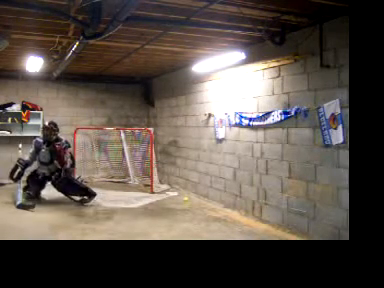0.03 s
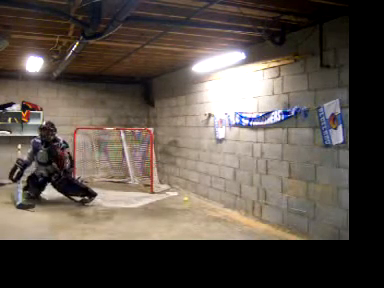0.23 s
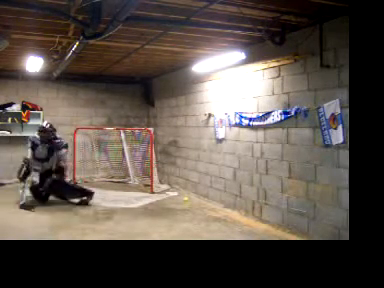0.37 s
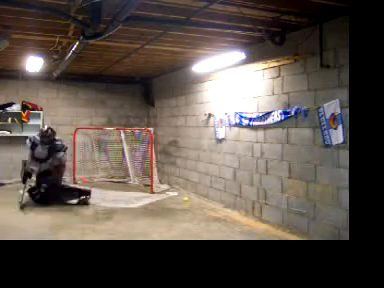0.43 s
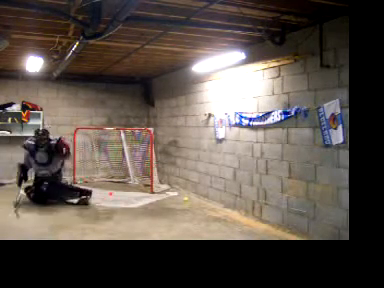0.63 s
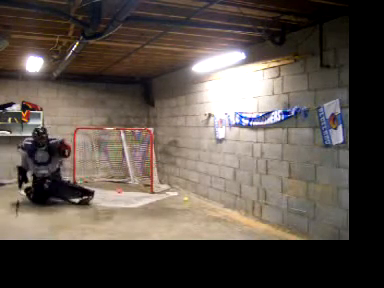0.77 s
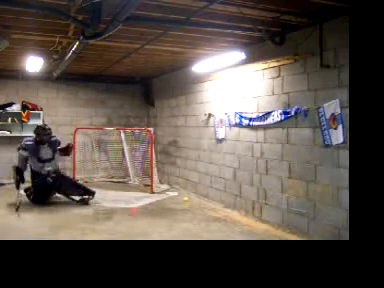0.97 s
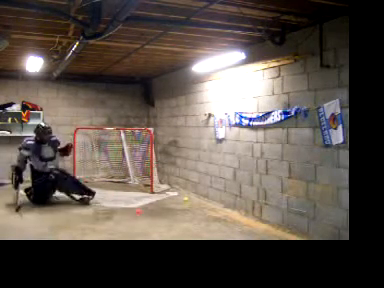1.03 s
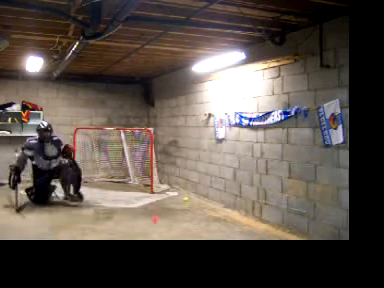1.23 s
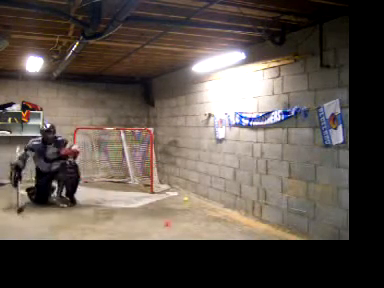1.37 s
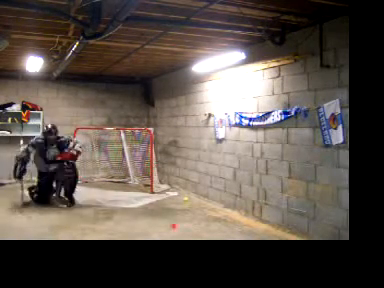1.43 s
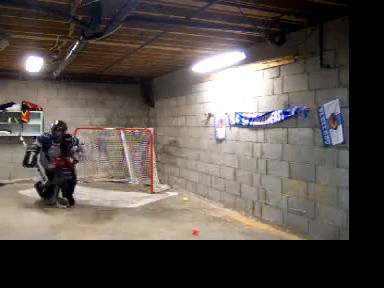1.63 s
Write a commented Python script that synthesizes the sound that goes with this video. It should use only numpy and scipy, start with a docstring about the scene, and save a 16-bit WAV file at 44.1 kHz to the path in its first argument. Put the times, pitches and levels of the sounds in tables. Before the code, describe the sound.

A sharp hockey shot clacks off concrete, then the ball hits goalie padding with a crack and boom. Knees thud, gear rustles faintly and the ball bounces softly in a reverberant, hissy basement. The microphone overloads slightly on the peaks.

```python
"""Street hockey shot in a concrete basement.

The stick slaps and scrapes the floor and knocks the ball away; the ball smacks into the goalie's pad,
he drops to his knees, and the ball bounces off softly. Gear rustles over a low room hiss and a faint
throb. A narrow-band microphone overloads on the loudest peaks."""
import sys
import numpy as np
from scipy import signal
from scipy.fft import rfft, irfft
from scipy.io import wavfile
from scipy.ndimage import uniform_filter1d, minimum_filter1d

SR = 44100
rng = np.random.default_rng(int(sys.argv[2]) if len(sys.argv) > 2 else 0)


def waveform_to_disk(signal):
    """Save audio, clipped to [-1, 1], as 16-bit WAV at the path in sys.argv[1]."""
    frames = np.transpose(np.atleast_2d(signal))
    scaled = np.clip(frames, -1, 1) * 32767
    samples = np.round(scaled).astype(np.int16)
    wavfile.write(sys.argv[1], SR, samples)


N = 74970
TIME = np.arange(N) / SR
BIN_HZ = np.fft.rfftfreq(N, 1 / SR)
BAND_HZ = 4800


def from_db(db):
    """Decibels to gain."""
    return 10 ** (np.asarray(db) / 20)


def rms_one(x):
    """Scale to unit rms."""
    return x / np.sqrt(np.mean(x ** 2) + 1e-20)


def at_hz(points, hz):
    """Read a table along log frequency."""
    point_hz, value = np.transpose(points)
    return np.interp(np.log(hz + 1e-9), np.log(point_hz), value)


def coloured(x, colour):
    """Shape the spectrum and cut it at BAND_HZ; unit rms."""
    return rms_one(irfft(rfft(x) * from_db(at_hz(colour, BIN_HZ)) * (BIN_HZ < BAND_HZ), N))


def noise(colour):
    """Steady noise of the given spectrum."""
    return coloured(rng.standard_normal(N), colour)


def decay(start_s, t60_s):
    """A sudden start and an exponential decay."""
    return (TIME >= start_s) * np.exp(-np.log(1000) * np.maximum(TIME - start_s, 0) / t60_s)


HARD_CONTACT_S, PAD_CONTACT_S, SOFT_CONTACT_S = .00042, .0008, .009
def strike(blows, modes, contact_s):
    """Each blow swells over the contact time and rings every mode, with slightly varying strength."""
    out = np.zeros(N)
    for start, db in blows:
        swell = 1 - np.exp(-np.maximum(TIME - start, 0) / contact_s)
        for k, (hz, mode_db, t60) in enumerate(modes):
            gain = (-1) ** k * from_db(db + mode_db + rng.standard_normal())
            out += gain * swell * decay(start, t60) * np.sin(2 * np.pi * hz * (TIME - start))
    return out


# Wall and ceiling returns. Each row: delay in seconds, relative level in dB.
ECHOES = [(0.0108, -3), (0.0164, -18), (.0322, -4), (.0522, -11.5)]
# Reverberation. Each row: frequency in Hz, T60 in seconds.
ROOM_T60 = [(120, 0.58), (400, 0.74), (600, 0.8), (1000, 0.67), (2200, 0.59), (4000, 0.48)]
def basement(x, tail_db, echo_db):
    """Direct sound, a few hard echoes and a diffuse tail that dies band by band."""
    onset_s, build_s = .0017, .014
    build = np.clip((TIME - onset_s) / build_s, 0, 1)
    white = rfft(rng.standard_normal(N))
    edges_hz = np.geomspace(80, 5120, 31)
    response = np.zeros(N)
    for low, high in zip(edges_hz, edges_hz[1:]):
        band = irfft(white * (BIN_HZ >= low) * (BIN_HZ < high), N)
        tail = band * build * decay(0, at_hz(ROOM_T60, np.sqrt(low * high)))
        response += from_db(tail_db) * rms_one(tail) * np.sqrt(2 * (high - low) / SR / N)
    echoes = sum(from_db(db + echo_db) * np.interp(TIME - lag, TIME, x, left=0) for lag, db in ECHOES)
    return x + echoes + signal.fftconvolve(x, response)[:N]


# Hiss spectrum. Each row: frequency in Hz, relative level in dB.
HISS_COLOUR = [(20, -12.5), (60, -10), (110, -8), (148, -1), (200, -9.5), (340, 1.5), (550, -1.5),
               (800, -3.5), (1100, -11), (1600, -19), (2300, -15.5), (3200, -22.5), (4200, -27)]
def room_hiss():
    """The steady low noise of the room."""
    return from_db(-41) * noise(HISS_COLOUR)


def throb():
    """A faint, regular down-and-up pulse in the bass, probably electrical."""
    rate_hz, first_s, width_s = 15, .0327, .0038
    offset_cycles = ((TIME - first_s) * rate_hz + .5) % 1 - .5
    offset_widths = offset_cycles / rate_hz / width_s
    return from_db(-35) * offset_widths * np.exp(-offset_widths ** 2)


# Spectrum of the raised noise floor. Each row: frequency in Hz, relative level in dB.
FLOOR_COLOUR = [(25, -4), (70, 1.5), (150, -2), (270, -1.5), (450, 5.5), (800, -1.5), (1200, -8),
                (1700, -15.5), (4000, -21)]
def raised_floor():
    """Low noise, louder at first and sinking after the shot, probably the recorder's gain control."""
    hold_s, fade_s = .38, .17
    fade = np.clip(1 - (TIME - hold_s) / fade_s, 0, 1)
    return from_db(-34.5) * fade * noise(FLOOR_COLOUR)


# Gear movements. Each row: centre in seconds, half length in seconds, level in dB.
RUSTLES = [(0.023, 0.049, -58), (.08, 0.075, -50.5), (0.908, .012, -53), (1.544, 0.0076, -49.5),
           (1.604, 0.039, -61)]
# Rustle spectrum. Each row: frequency in Hz, relative level in dB.
RUSTLE_COLOUR = [(300, 2), (1000, 2), (1600, -7), (2000, 11), (2600, 6), (3100, -0.5), (3600, 4.5),
                 (4400, -5.5)]
def gear_rustle():
    """Gear rustles in short, smooth swells of noise."""
    swells = sum(from_db(db) * np.exp(-((TIME - centre) / half) ** 2) for centre, half, db in RUSTLES)
    return swells * noise(RUSTLE_COLOUR)


# Buckle and stick clicks. Each row: start in seconds, level in dB.
CLICKS = [(.672, -40), (.8, -45), (.832, -41.5), (1.14, -45.5), (1.165, -77), (1.415, -49.5)]
# Bright ring of a hard edge. Each row: frequency in Hz, gain in dB, T60 in seconds.
EDGE_MODES = [(3420, 2, 0.0083), (3758, 0.5, 0.019), (4140, -18, 0.016)]
def gear_clicks():
    """Small hard contacts ring buckles and stick."""
    return strike(CLICKS, EDGE_MODES, HARD_CONTACT_S)


# Landings. Each row: start in seconds, level in dB.
THUDS = [(.25, -35), (.512, -25), (.53, -26)]
# Thud resonances. Each row: frequency in Hz, gain in dB, T60 in seconds.
THUD_MODES = [(138, -6.5, 0.26), (156, -13, 0.22), (235, -0.5, .08)]
def knee_thuds():
    """Knees and pads land on the floor with a soft, low ring."""
    return strike(THUDS, THUD_MODES, SOFT_CONTACT_S)


# Ball and pad contacts. Each row: start in seconds, level in dB.
BUMPS = [(.565, -9.5), (.742, -26), (.812, -25), (.905, -25.5), (.923, -18.5), (.945, -23), (.975, -41),
         (1.02, -43), (1.494, -25.5), (1.529, -25.5), (1.542, -19), (1.567, -38.5), (1.605, -51)]
# Bump resonances. Each row: frequency in Hz, gain in dB, T60 in seconds.
BUMP_MODES = [(419, -4, 0.037), (543.6, -1.5, 0.039), (660.4, -3, 0.041), (820, -10, .035),
              (1053, -13, 0.054), (1267, -8, 0.022), (2006, -6, 0.017)]
def soft_bumps():
    """The ball bounces softly and the pads bump."""
    return strike(BUMPS, BUMP_MODES, SOFT_CONTACT_S)


# Floor slaps. Each row: start in seconds, noise level in dB, noise T60 in seconds, edge level in dB.
SLAPS = [(0.1958, -24.5, .03, -20.5), (0.199, -18, 0.11, -15), (0.2115, -21, 0.11, -25),
         (0.2247, -24, .07, -37), (0.2649, -18.5, 0.09, -12.5)]
# Spectrum of blade on concrete. Each row: frequency in Hz, relative level in dB.
SLAP_COLOUR = [(100, -34), (400, -6.5), (900, -12), (1300, -7), (1600, -7), (1850, -4.5), (2500, -5.5),
               (3200, -6.5), (3800, -14), (4400, -8)]
def blade_slaps():
    """The blade hits the concrete: bursts of noise and a bright ring of its edge."""
    bursts = sum(from_db(db) * decay(start, t60) for start, db, t60, _ in SLAPS)
    edge_blows = [(start, edge_db) for start, _, _, edge_db in SLAPS]
    return bursts * noise(SLAP_COLOUR) + strike(edge_blows, EDGE_MODES, HARD_CONTACT_S)


def blade_scrape():
    """The blade drags over grit between the slaps, pressing harder and then lifting."""
    start_s, peak_s, end_s, grains_per_s = .205, .2273, .283, 4200
    grit = (rng.random(N) < grains_per_s / SR) * rng.standard_normal(N)
    pressure = np.interp(TIME, [start_s, peak_s, end_s], [0, 1, 0])
    return from_db(-20.5) * pressure * coloured(grit, SLAP_COLOUR)


# Blows on ball and floor. Each row: start in seconds, level in dB.
KNOCKS = [(.2425, -5), (.2675, -8.5), (.2805, -17.5), (.364, -31.5), (.385, -30)]
# Blade resonances. Each row: frequency in Hz, gain in dB, T60 in seconds.
BLADE_MODES = [(245, -20.5, 0.046), (320, -13.5, 0.045), (430, -6.5, 0.042), (558, -1.5, .03),
               (687, -2.5, 0.036), (818, -2.5, 0.021), (906, -2.5, .03), (1177, -8.5, 0.017)]
# Clack spectrum. Each row: frequency in Hz, relative level in dB.
CLACK_COLOUR = [(100, -20), (250, -26.5), (400, -0.5), (900, -3), (1400, -25.5), (2400, -2), (4200, -22)]
def blade_knocks():
    """Each knock gives a short toneless clack and rings the blade."""
    bursts = sum(from_db(db - 6) * decay(start, t60_s=.04) for start, db in KNOCKS)
    return bursts * noise(CLACK_COLOUR) + strike(KNOCKS, BLADE_MODES, HARD_CONTACT_S)


# Cover resonances. Each row: frequency in Hz, gain in dB, T60 in seconds.
COVER_MODES = [(1112, -14.5, 0.042), (1888, 1.5, 0.013), (2174, -15, .012), (2375, -7, .01),
               (3000, -9, 0.016), (3430, -21.5, 0.019)]
# Spectrum of the crumpling cover. Each row: frequency in Hz, relative level in dB.
CREASE_COLOUR = [(250, -11.5), (700, -13.5), (1200, -4), (1550, -7.5), (1900, -5), (2600, 6), (3300, -10),
                 (4200, -14)]
# Padding resonances. Each row: frequency in Hz, gain in dB, T60 in seconds.
PAD_MODES = [(355.6, -12.5, 0.061), (428.4, -3.5, 0.055), (513, -6, 0.059), (633, -2, 0.035),
             (879, -8, 0.023)]
def pad_save():
    """The ball hits the pad: the cover cracks and crumples, then the padding booms."""
    hit_s, boom_delay_s, crack_db, boom_db = .476, .003, -3, 4
    crack = strike([(hit_s, crack_db)], COVER_MODES, HARD_CONTACT_S)
    crease = from_db(-8) * decay(hit_s, t60_s=.049) * noise(CREASE_COLOUR)
    boom = strike([(hit_s + boom_delay_s, boom_db)], PAD_MODES, PAD_CONTACT_S)
    return basement(crack + crease, tail_db=-5.5, echo_db=-40) + basement(boom, tail_db=-4, echo_db=-5)


def scene():
    """Shot, save and gear ring in the basement over the background; mono."""
    blade_sounds = [blade_slaps() + blade_scrape(), blade_knocks()]
    shot = sum(basement(sound, tail_db=2, echo_db=-8) for sound in blade_sounds)
    save = pad_save()
    movement = gear_rustle() + knee_thuds() + soft_bumps() + gear_clicks()
    far_end = basement(movement, tail_db=3.5, echo_db=-6.5)
    return (shot + save + far_end + room_hiss() + raised_floor() + throb())[None]


def record(dry):
    """A narrow-band microphone with a fast limiter; the highest peaks still clip; the top is cut."""
    mic_edge_hz, top_cut_hz = 4106, 15900
    limit, overload, window_s = .74, .691, .002
    x = signal.sosfilt(signal.butter(10, mic_edge_hz, fs=SR, output="sos"), dry)
    x = signal.sosfilt(signal.cheby2(16, 70, BAND_HZ, fs=SR, output="sos"), x)
    window = int(window_s * SR)
    needed_gain = limit / np.maximum(np.abs(x), limit)
    smooth_gain = uniform_filter1d(minimum_filter1d(needed_gain, size=window), size=window)
    x = np.clip(x * smooth_gain, -overload, overload)
    return signal.sosfilt(signal.cheby2(12, 70, top_cut_hz, fs=SR, output="sos"), x)


dry = scene()
out = record(dry)
waveform_to_disk(out)
```